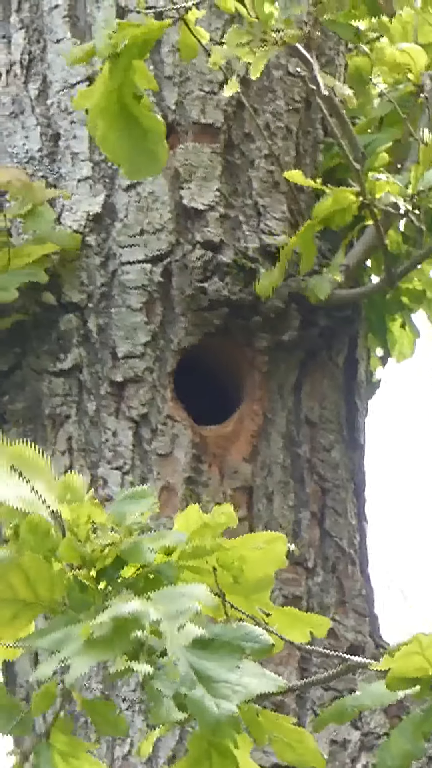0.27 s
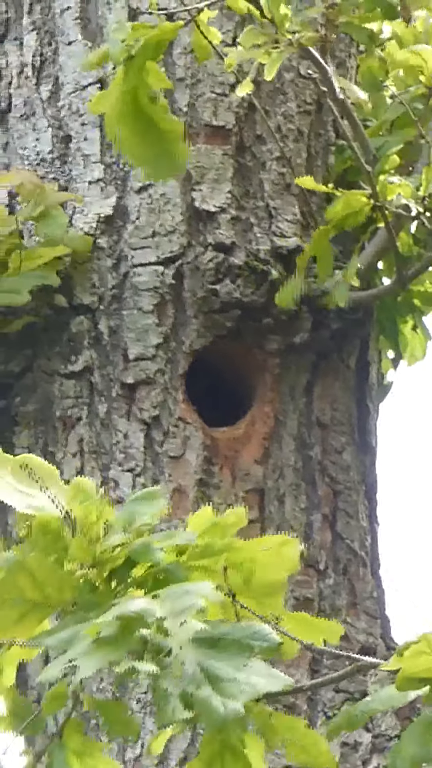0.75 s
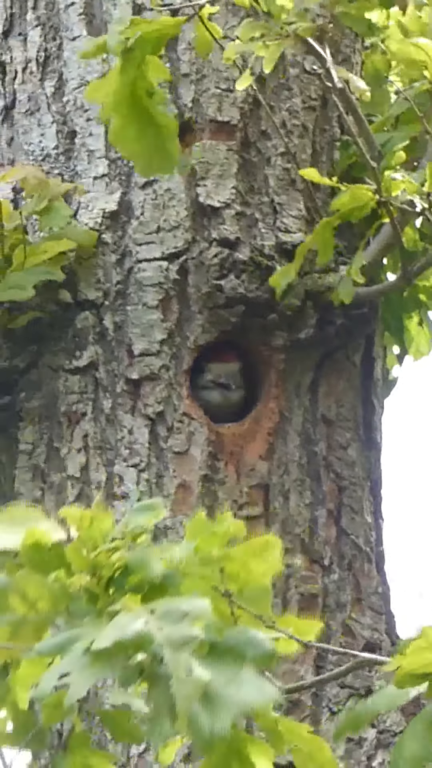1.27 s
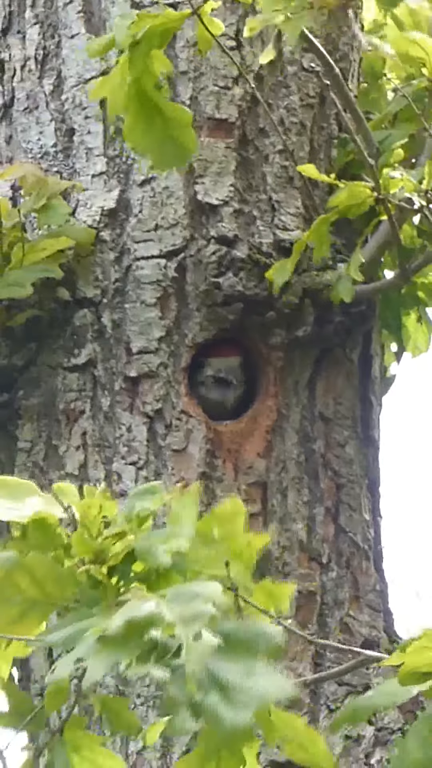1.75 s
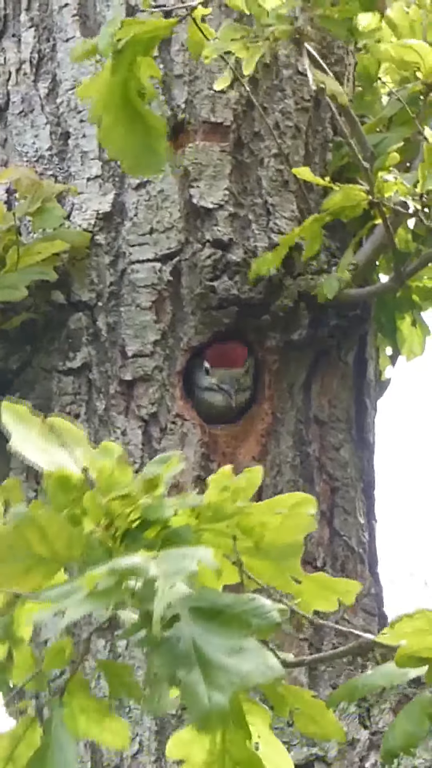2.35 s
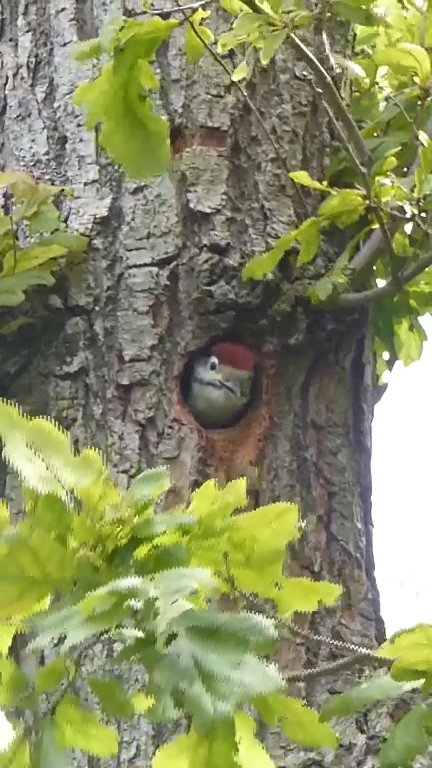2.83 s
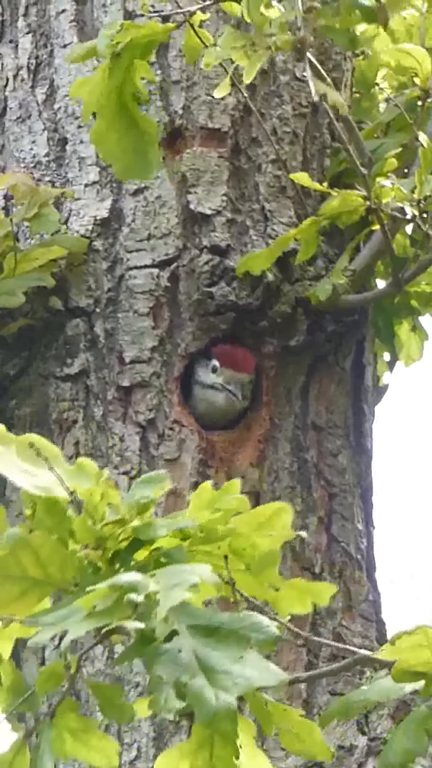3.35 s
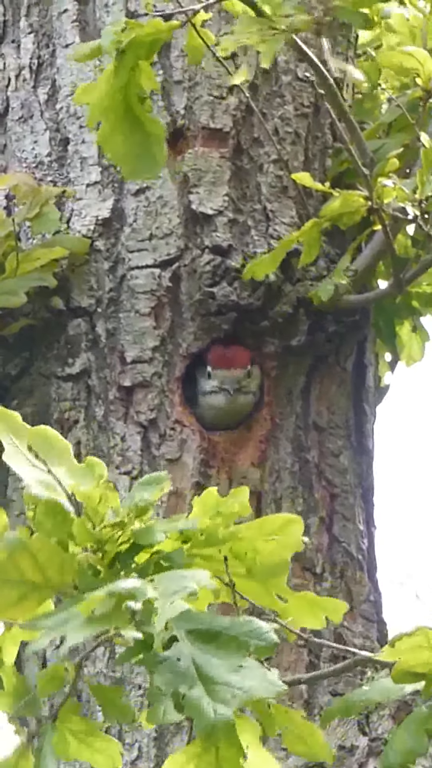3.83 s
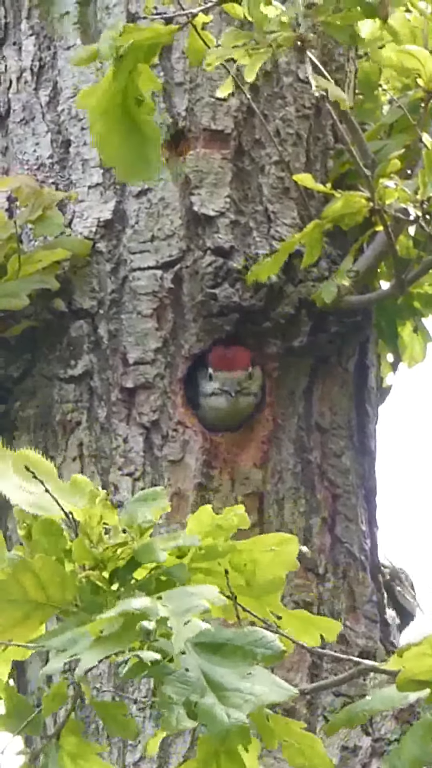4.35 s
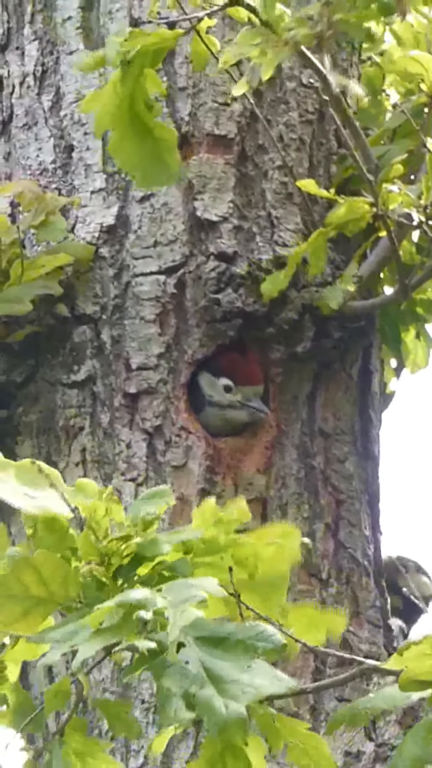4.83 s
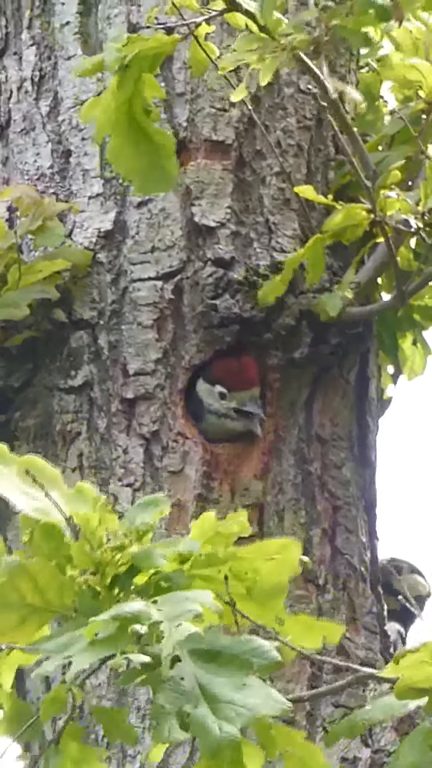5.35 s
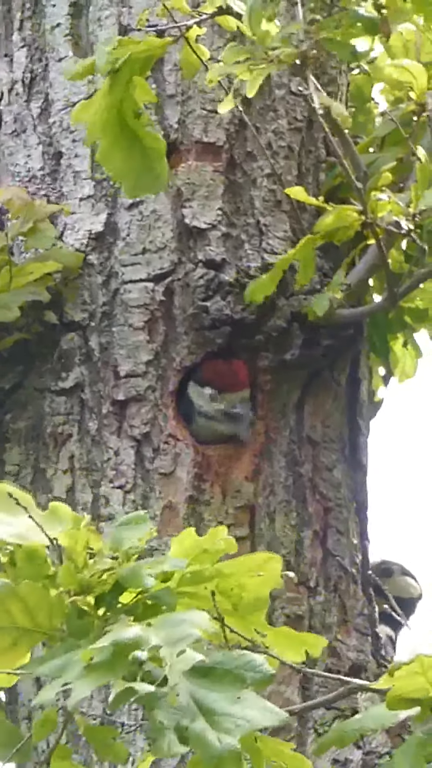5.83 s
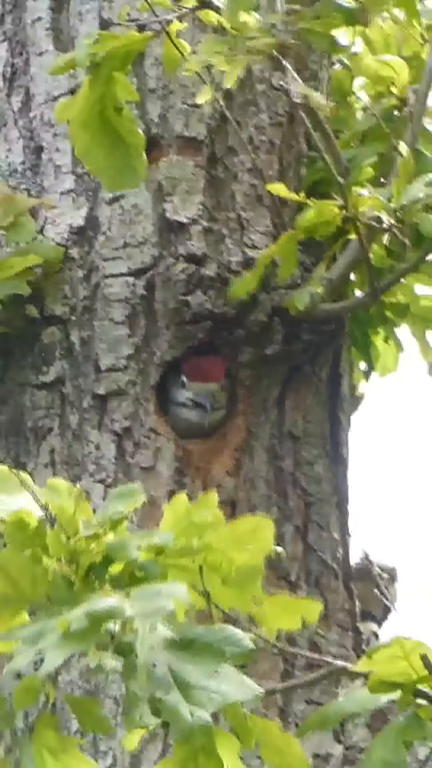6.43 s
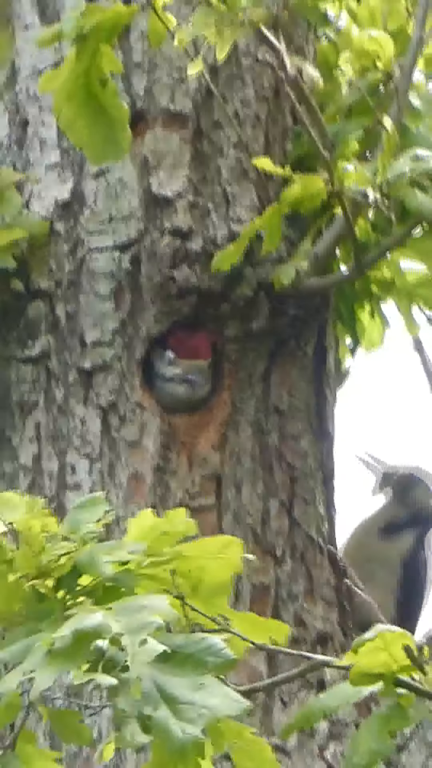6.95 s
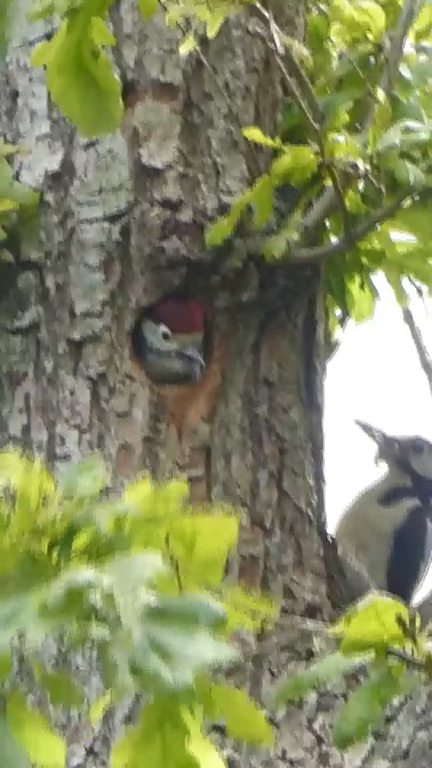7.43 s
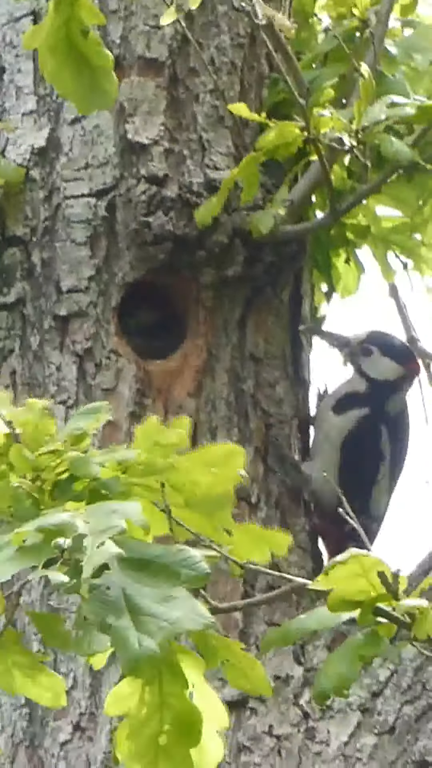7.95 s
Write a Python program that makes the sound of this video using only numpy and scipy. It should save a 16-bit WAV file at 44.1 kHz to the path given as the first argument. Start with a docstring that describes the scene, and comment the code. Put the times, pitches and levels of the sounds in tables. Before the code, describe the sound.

A woodpecker chick begs from a hole in a tree with very short, high, slightly hoarse peeps, about three a second. About six seconds in, an adult scrabbles on the bark with a quick burst of sharp claw snaps and a brief squeal, the loudest moment. The peeps carry on and grow weaker. Faint far birds, soft leaf rustle and a low wash of distant traffic lie behind.

```python
"""Woodpecker chick at the nest hole

A chick begs in short peeps: its syrinx sweeps a pitch arch, its beak filters the harmonics, and
trunks and leaves scatter them back. The parent hops up the bark with snapping claws and a squeal.
Far birds whistle over distant traffic and the hiss of leaves in a breeze."""
import sys
import numpy as np
from scipy import signal
from scipy.fft import rfft, irfft
from scipy.io import wavfile
from scipy.ndimage import uniform_filter1d

SR = 44100
rng = np.random.default_rng(int(sys.argv[2]) if len(sys.argv) > 2 else 0)


def wav_out(sig):
    """Save sig, one row per channel (or a flat mono array), as 16-bit PCM at SR to the path in sys.argv[1]."""
    wavfile.write(sys.argv[1], SR, np.round(np.clip(np.atleast_2d(sig).T, -1, 1) * 32767).astype(np.int16))


N = 361179


def gain_of(db):
    """Amplitude ratio of a level in decibels."""
    return 10 ** (np.asarray(db) / 20)


def unit_rms(x):
    """Normalisation to an rms of 1."""
    return x / np.sqrt(np.mean(x ** 2) + 1e-20)


def at_hz(points, hz):
    """Interpolation on a logarithmic frequency axis."""
    f, value = np.transpose(points)
    return np.interp(np.log(hz + 1), np.log(f + 1), value)


def envelope(points):
    """Amplitude at each sample, interpolated in decibels."""
    return gain_of(np.interp(np.arange(N) / SR, *np.transpose(points)))


def drift(count, smooth):
    """Low-pass noise of rms 1: two moving averages of `smooth` samples."""
    return unit_rms(uniform_filter1d(uniform_filter1d(rng.standard_normal(count), smooth), smooth))


def add(mix, start, sound):
    """Superposition of a sound delayed by `start` seconds."""
    part = mix[..., round(start * SR):][..., :sound.shape[-1]]
    part += sound[..., :part.shape[-1]]


def play(source, events):
    """Stereo sum of one sound per row; the first column is its onset."""
    mix = np.zeros((2, N))
    for start, *settings in events:
        add(mix, start, source(*settings))
    return mix


# Likeness of left and right in the background: (frequency [Hz], correlation [0-1])
COHERENCE = [(60, 0.73), (380, 0.99), (950, 0.38), (2380, 0.35), (5980, 0.76), (15000, 0.68)]
def diffuse_noise(spectrum, levels, patchy_db):
    """Partially coherent stereo noise, built from random short-time spectra with drifting patches."""
    hz = np.fft.rfftfreq(1024, 1 / SR)
    re, im, other_re, other_im, patches = rng.standard_normal((N // 256 + 5, 513, 5)).T
    patches = unit_rms(uniform_filter1d(uniform_filter1d(patches, 10, axis=0), 14, axis=1))
    shared = at_hz(COHERENCE, hz)[:, None]
    left = re + 1j * im
    right = shared * left + np.sqrt(1 - shared ** 2) * (other_re + 1j * other_im)
    spectra = np.array([left, right]) * gain_of(at_hz(spectrum, hz)[:, None] + patchy_db * patches)
    return unit_rms(signal.istft(spectra, nperseg=1024, noverlap=768)[1][:, :N]) * envelope(levels)


# Traffic spectrum: (frequency [Hz], relative spectral density [dB])
TRAFFIC_SPECTRUM = [(40, -25.5), (80, -44), (130, -10), (235, -3), (414, 0.5), (1820, -19), (2150, -16),
                    (2390, -22.5), (4210, -22), (7030, -27.5), (8270, -35), (9990, -29.5), (14600, -37.5),
                    (15800, -63)]
# Traffic loudness: (time [s], level [dB])
TRAFFIC_LEVELS = [(0.0, -48.5), (6.07, -47.5), (8.19, -49.5)]
def traffic():
    """Distant vehicles sum incoherently to a nearly steady, low wash."""
    return diffuse_noise(TRAFFIC_SPECTRUM, TRAFFIC_LEVELS, patchy_db=0.82)


# Rustle spectrum: (frequency [Hz], relative spectral density [dB])
LEAF_SPECTRUM = [(700, -1.5), (1500, 3), (3500, 4.5), (6000, -5), (10000, -11), (15000, -24)]
# Rustle loudness: (time [s], level [dB])
LEAF_LEVELS = [(0.0, -56), (2.17, -58.5), (3.35, -59), (3.8, -65.5), (4.24, -62), (4.84, -59.5),
               (4.97, -51.5), (5.61, -58.5), (6.09, -50.5), (6.27, -56), (8.19, -62)]
def leaves():
    """Friction among leaves gives broadband noise that swells with the breeze."""
    return diffuse_noise(LEAF_SPECTRUM, LEAF_LEVELS, patchy_db=2.0)


def glide_phase(length, first_hz, last_hz):
    """Phase is the integral of frequency, here a slightly wavering linear glide."""
    count = round(length * SR)
    hz = np.linspace(first_hz, last_hz, count) * (1 + 0.0025 * drift(count, smooth=300))
    return 2 * np.pi * np.cumsum(hz) / SR


def waver(sound, db, depth_db=3.8, smooth=200, taper=0.55):
    """Random amplitude modulation under a window with tapered ends."""
    count = len(sound)
    return gain_of(db + depth_db * drift(count, smooth)) * sound * signal.windows.tukey(count, taper)


# Whistles and two low hoots:
# (time [s], duration [s], first pitch [Hz], last pitch [Hz], relative level [dB])
FAR_CALLS = [(0.88, 0.9, 386, 386, -51.5), (1.108, 0.083, 4300, 4250, -57), (1.505, 0.15, 3680, 3480, -58),
             (1.533, 0.18, 4000, 4400, -57.5), (1.69, 0.072, 4000, 4000, -58),
             (1.655, 0.27, 3300, 3100, -62), (0.018, .11, 3100, 3080, -60), (2, 0.069, 2150, 2210, -58),
             (2.46, 0.26, 2240, 2230, -57), (2.695, 0.015, 3100, 3200, -47), (1.65, .09, 5980, 5920, -65),
             (3.4, 0.1, 6200, 6190, -65.5), (2.93, 0.048, 4290, 4300, -56), (3.515, .11, 4300, 4150, -60),
             (2.92, 0.26, 3140, 3070, -63.5), (2.895, 0.19, 2020, 1946, -60),
             (3.26, 0.096, 4200, 4270, -55), (3.474, 0.19, 3550, 3700, -56), (3.648, 0.27, 3700, 3560, -56),
             (3.665, 0.068, 3100, 2900, -56.5), (3.896, 0.054, 4270, 4320, -54.5),
             (4.069, 0.077, 4180, 4190, -61), (5.128, 0.09, 1830, 1700, -58), (5.33, 0.11, 3290, 3180, -58),
             (5.285, 0.21, 325.3, 310, -49), (7.612, 0.031, 2100, 2400, -54),
             (7.625, 0.19, 3230, 3170, -61)]
def far_bird(length, first_hz, last_hz, db):
    """A gliding pure tone fluctuates in amplitude on its way through the branches."""
    return waver(np.sin(glide_phase(length, first_hz, last_hz)), db)


# Begging calls: (time [s], rise [s], fall [s], top pitch [Hz], lateness of beak opening [0-1],
# voice level [dB], brightness [dB], push into the fall [dB])
PEEPS = [(.132, 0.017, 0.014, 2564, 0.14, -47.5, 5, -4.5), (0.422, .022, 0.023, 2603, 0.1, -44.5, 1, -5),
         (.636, 0.01, 0.022, 2700, 0.46, -45.5, 1, -0.5),
         (.901, 0.021, 0.013, 2566, 0.12, -48.5, 3.5, -1.5),
         (1.173, 0.018, 0.018, 2674, 0.55, -42, -5, 0.5), (1.454, 0.021, 0.012, 2514, .27, -47, -2, 3),
         (1.769, 0.02, 0.018, 2624, 0, -46, -1.5, 1), (2.032, 0.018, 0.014, 2766, 0.18, -44, -1, -10),
         (2.261, 0.014, 0.023, 2735, 0.21, -45.5, 2, -14), (2.466, 0.027, 0.024, 2653, 0.23, -46.5, 4, -9),
         (3.203, 0.016, 0.018, 2550, 0.1, -49, -0.5, 2.5), (3.535, 0.013, 0.02, 2640, 0.55, -50, 0, 1.5),
         (3.846, 0.02, 0.015, 2615, 0.22, -48, 3.2, -6), (4.2, 0.02, 0.015, 2560, 0.05, -46.5, 0.5, 0.5),
         (4.455, 0.016, 0.018, 2528, 0.12, -51, 3, 0), (4.794, 0.019, 0.016, 2505, 0.14, -48.5, 1.4, 2),
         (5.078, 0.019, 0.023, 2637, 0, -49.5, 2.5, 7.5), (5.29, .023, 0.016, 2598, .19, -46, 2, -2),
         (5.531, 0.023, 0.014, 2554, 0.12, -45, 0, -3), (5.83, 0.021, 0.012, 2717, 0.36, -43.5, -5, -3),
         (6.175, 0.012, 0.023, 2770, 0.57, -45, -5.5, -5),
         (6.475, .017, 0.018, 2724, 0.27, -44.5, -5.5, -8),
         (6.764, .019, 0.017, 2620, 0.22, -50.5, -2.5, -3), (7.048, 0.016, 0.019, 2596, 0.16, -50, -1, 1.5),
         (7.307, 0.015, 0.02, 2580, 0, -58.5, -7.5, 3), (7.348, 0.016, 0.02, 2570, .29, -49.5, -4.5, -0.5),
         (7.559, 0.016, 0.015, 2560, .03, -57.5, -6.5, 5.5),
         (7.657, 0.017, 0.019, 2553, 0.24, -50.5, -8.5, 1), (7.778, 0.014, 0.011, 2350, .03, -63, -3, -6),
         (7.958, 0.015, 0.017, 2480, 0, -59, -6, -4), (8.037, 0.011, 0.026, 2756, 0.5, -48.5, -17, -11),
         (8.163, 0.014, .017, 2370, .03, -68, 2.5, -4)]
# Harmonics 1 to 6: (offset from voice level [dB], share of brightness [ratio], share of tilt [ratio])
HARMONICS = [(3, 0, 0.11), (2, 1.1, -0.22), (2.5, 0.89, 0.017), (-2, 0.96, 1.18), (-4.5, 1.25, -0.11),
             (-14, 1.4, 0.27)]
# Two resonances and a notch of the beak: (frequency [Hz], width [Hz], gain [dB])
BEAK_BANDS = [(6820, 700, 7.5), (9980, 570, 9), (13040, 440, -12)]
# The head turns in the hole, trading the second harmonic against the fourth: (time [s], tilt [dB])
HEAD_TILT = [(0, -2.5), (.95, -2), (1.17, -31), (1.46, -8), (2.26, -13), (2.6, 8), (3.2, 4.5), (3.85, 0.2),
             (5.29, -3.5), (5.84, -12), (6.18, -15), (6.77, 1), (8.19, -3)]
def peep(start, rise_s, fall_s, top_hz, late, voice_db, bright_db, push_db):
    """Source and filter: hoarse harmonics arch through the beak's bands, then drop to a cluck."""
    cluck_hz, scoop_s = 1440, 0.001502  # pitch of the slack syrinx; time constant of the leap from it
    length = rise_s + fall_s
    t = np.arange(round((length + 0.022) * SR)) / SR
    falling = np.clip((t - rise_s) / fall_s, 0, 1)
    rise_sag = 0.1585 * (abs(rise_s - t) / rise_s) ** 2.052
    arch = 1 - np.where(t < rise_s, rise_sag, 0.25 * falling ** 2.7)  # fraction of the top pitch
    slack = np.clip((t - length) / 0.00493, 0, 1)
    scoop = np.exp(-t / scoop_s)
    hz = top_hz * arch + np.maximum(slack, scoop) * (cluck_hz - top_hz * arch)
    jitter = 0.0055 + 0.18 * slack * (1 - slack) + 0.043 * slack
    hz *= 1 + jitter * drift(len(t), smooth=25)
    phase = 2 * np.pi * np.cumsum(hz) / SR
    slack_db = -30 * slack * (1.17 - slack)  # the voice weakens in the slide
    opening = np.clip((t / length - late + 0.43) / 0.53, 0.05, 1)  # a shut beak muffles upper harmonics
    tilt_db = np.interp(start, *np.transpose(HEAD_TILT))
    levels_db = [voice_db + db + bright * bright_db + tilt * tilt_db for db, bright, tilt in HARMONICS]
    voice = np.zeros(len(t))
    for k, db in enumerate(levels_db, 1):
        beak_db = sum(gain * np.exp(-((k * hz - f) / width) ** 2) for f, width, gain in BEAK_BANDS)
        ending_db = falling ** 2 * push_db * (1 if k == 3 else 0.3)
        sag_db = -26 / k ** 0.52 * (1 - arch) * (1 - slack) if k < 3 else 0
        flutter_db = (0.096 + min(k, 3)) * drift(len(t), smooth=70)
        amplitude = gain_of(db + beak_db + ending_db + sag_db + flutter_db + slack_db)
        onset = opening ** (1.04 * (k - 1)) * (1 - scoop) ** k
        # uneven cycles spread noise around each harmonic
        hoarse = 1 + (0.025 + 0.0052 * (k - 1) + 1.15 * slack) * drift(len(t), smooth=12)
        voice += amplitude * onset * hoarse * np.sin(k * phase) * (k * hz < SR / 2)
    air = signal.lfilter(*signal.butter(2, (3000, 10500), "band", fs=SR), rng.standard_normal(len(t)))
    puff = 3 * np.exp(-t / 0.0057)
    breath = gain_of(levels_db[2]) * air * (0.22 + 0.72 * slack + puff) * opening
    click = gain_of(voice_db + 1) * air * np.exp(-((t - length) / 0.0021 - 1) ** 2)  # the beak shuts
    effort = np.clip(t / 0.0049, 0, 1) ** 0.4 * np.clip((t[-1] - t) / 0.02, 0, 1) * arch ** 0.8
    return (voice + breath + click) * effort


def begging_chick():
    """Early reflection: a delayed copy of the treble closely follows each peep."""
    calls = np.zeros((2, N))
    for start, *settings in PEEPS:
        add(calls, start, peep(start, *settings))
    treble = signal.lfilter(*signal.butter(2, 4000, "high", fs=SR), calls)
    add(calls, start=0.0076, sound=gain_of(-11.5) * treble)
    return calls


# Reverberation among the trunks: (frequency [Hz], time to decay by 60 dB [s])
TRUNK_DECAY = [(2500, 0.22), (5200, 0.45), (8000, 0.31), (14000, 0.16)]
def forest_echoes(sound):
    """Scattering by trunks and leaves: convolution with sparse echoes, each band dying at its own rate."""
    taps = np.zeros((3, SR // 2))  # one row common to both channels, then one for each
    slots = np.arange(40, SR // 2 - 20, 20)
    arrivals = slots + rng.integers(0, 20, (3, len(slots)))
    np.put_along_axis(taps, arrivals, rng.choice([-1., 1.], arrivals.shape), 1)
    hz, t, spectra = signal.stft(taps, SR, nperseg=256)
    hz = hz[:, None]
    near_twigs = np.minimum(hz / 6000, 1) * gain_of(-60 * t / 0.033)
    far_trunks = 0.51 * gain_of(-60 * t / at_hz(TRUNK_DECAY, hz))
    spectra *= near_twigs + far_trunks
    stereo = spectra[0] + (0.017 + hz / 9000) * spectra[1:]  # close microphones share low echoes most
    response = signal.istft(stereo, SR, nperseg=256)[1]
    return signal.fftconvolve(sound, response / np.linalg.norm(response[0]), axes=1)[:, :N]


# Hoarse rasps and feet scrabbling on bark: (time [s], duration [s], centre [Hz], width [Hz], level [dB])
RASPS = [(0.794, 0.02, 5000, 6000, -53.5), (2.55, .025, 5900, 500, -51), (2.655, 0.074, 5590, 700, -53.5),
         (2.915, 0.057, 6300, 960, -54), (4.872, 0.18, 4000, 1100, -54), (5.857, 0.26, 2480, 4040, -49.5),
         (5.86, .22, 825, 500, -55), (5.901, 0.17, 5030, 7000, -48), (7.501, 0.16, 4180, 900, -58.5)]
def rasp(length, centre_hz, width_hz, db):
    """Breath or friction gives one band of noise with a fluttering amplitude."""
    count = round(length * SR)
    hz = np.fft.rfftfreq(count, 1 / SR)
    band = np.exp(-((hz - centre_hz) / width_hz) ** 2) * hz ** 2 / (hz ** 2 + 500 ** 2)
    hiss = unit_rms(irfft(rfft(rng.standard_normal(count)) * band, count))
    return waver(hiss, db, depth_db=3.4, smooth=60, taper=0.6)


# Claws snapping on bark: (time [s], level [dB], left minus right [dB], decay time [ms])
SNAPS = [(5.87, -26, -3, 5.2), (5.914, -34, -3, 4.6), (5.9444, -35, 1, 3), (5.952, -38, -6, 3.6),
         (5.9995, -45, -7, 2.7), (6.0132, -26.5, -3, 4), (6.022, -38, 8, 3.6), (6.0361, -20, -2.5, 2.9)]
# Spectrum of a snap before the bark's resonance: (frequency [Hz], relative spectral density [dB])
SNAP_SPECTRUM = [(450, -18.5), (1000, -8), (1900, -2), (6420, -5), (6980, -4.5), (7770, -8), (14100, -15.5),
                 (15500, -24)]
def claw_snaps():
    """Impact excitation: each splintering burst is coloured by a broad resonance of the dry bark."""
    bark_hz, bark_db, lead_samples = 3080, 6, 32
    t, hz = np.arange(1024) / SR, np.fft.rfftfreq(1024, 1 / SR)
    resonance_db = bark_db * np.exp(-np.log(hz / bark_hz + 1e-9) ** 2 / 0.013)
    colour = gain_of(at_hz(SNAP_SPECTRUM, hz) + resonance_db)
    mix = np.zeros((2, N))
    for start, db, pan_db, decay_ms in SNAPS:
        burst = rng.standard_normal(1024) * np.exp(-t * 1000 / decay_ms) * np.minimum(t / 0.00083, 1)
        snap = irfft(rfft(np.roll(burst, lead_samples)) * colour)
        snap *= gain_of(db) / np.sqrt(np.mean(snap[:160] ** 2))
        add(mix, start - lead_samples / SR, snap * gain_of([[pan_db / 2], [-pan_db / 2]]))
    return mix


# The parent's squeal:
# (time [s], duration [s], first pitch [Hz], last pitch [Hz], level [dB], relative overtone level [dB])
SQUEALS = [(5.906, .09, 3160, 2980, -43, -10.5)]
def squeal(length, first_hz, last_hz, db, overtones_db):
    """Fast random modulation puts noisy sidebands on three harmonics, heard as hoarseness."""
    phase = glide_phase(length, first_hz, last_hz)
    fundamental = (1 + 0.75 * drift(len(phase), smooth=15)) * np.sin(phase)
    overtones = (1 + drift(len(phase), smooth=40)) * (np.sin(2 * phase) + np.sin(3 * phase))
    return waver(fundamental + gain_of(overtones_db) * overtones, db)


# Directivity: the chick turns away, changing only its direct sound: (time [s], gain [dB])
CHICK_FACING = [(0, -0.5), (5.9, 0.5), (6.3, -1)]
def scene():
    """Superposition of the birds' direct sound, their echoes, traffic and leaves."""
    chick = begging_chick()
    parent = play(squeal, SQUEALS) + play(rasp, RASPS) + claw_snaps()
    far = play(far_bird, FAR_CALLS)
    direct = chick * envelope(CHICK_FACING) + gain_of(-1) * far
    echoes = forest_echoes(chick + gain_of(-17) * parent + gain_of(2) * far)
    balance = gain_of([[-0.3], [0.3]])
    return (direct + echoes + traffic() + leaves()) * balance + parent


def record(dry):
    """Band limiting: the microphones lose the lowest bass, and a low-pass cuts the highest treble."""
    bass_hz, edge_hz = 50, 15900
    hz = np.fft.rfftfreq(N, 1 / SR)
    thin = irfft(rfft(dry) * hz / (hz + bass_hz), N)
    low_pass = signal.firwin(511, edge_hz, window=("kaiser", 9), fs=SR)
    return signal.oaconvolve(thin, low_pass[None], "same")


dry = scene()
out = record(dry)
wav_out(out)
```